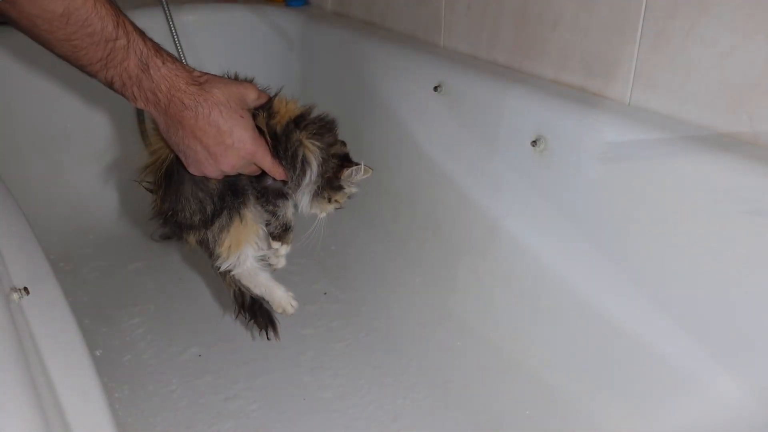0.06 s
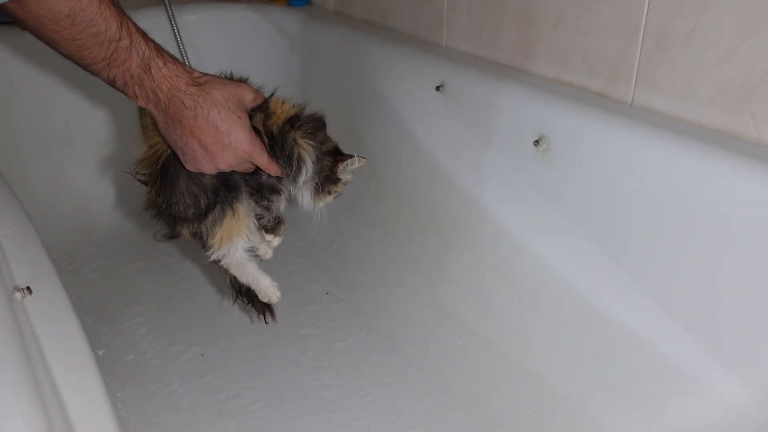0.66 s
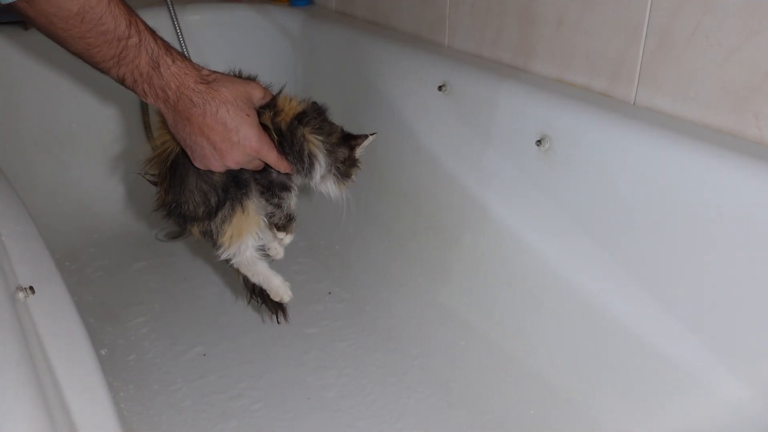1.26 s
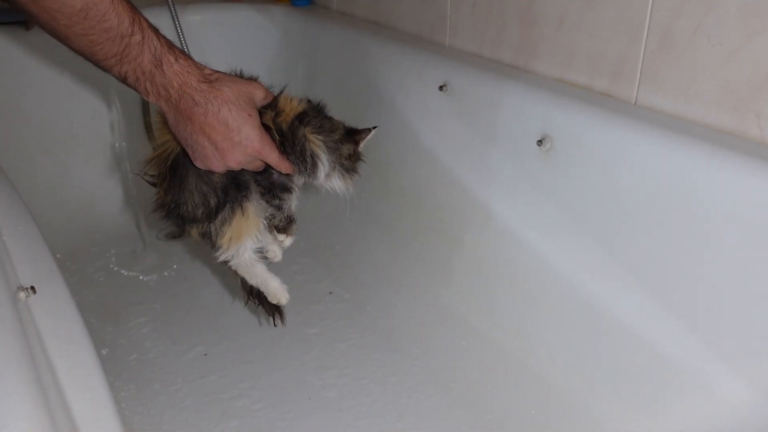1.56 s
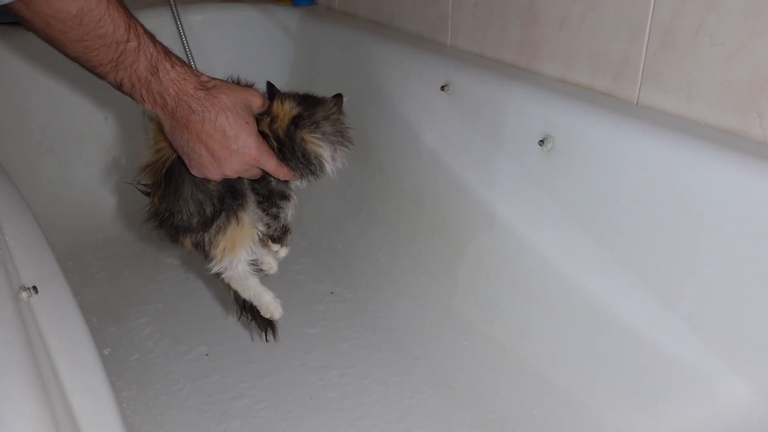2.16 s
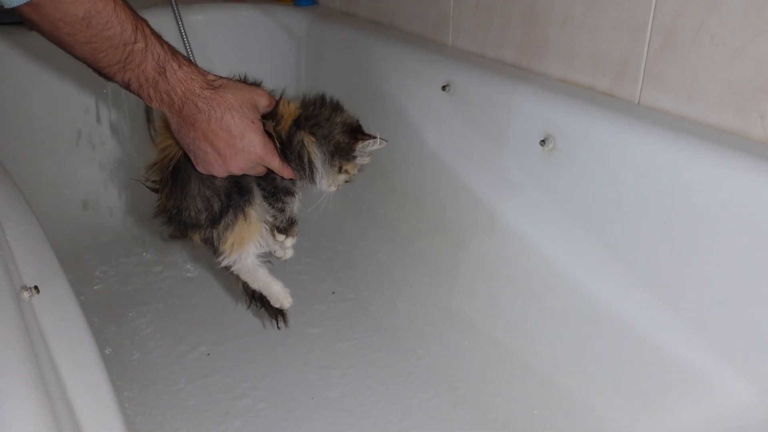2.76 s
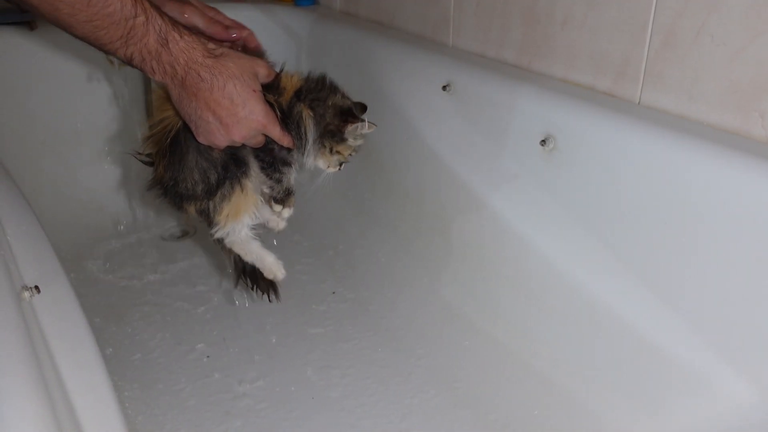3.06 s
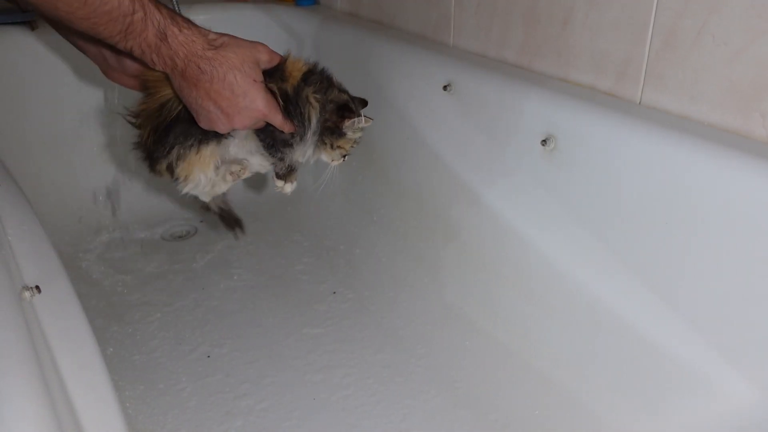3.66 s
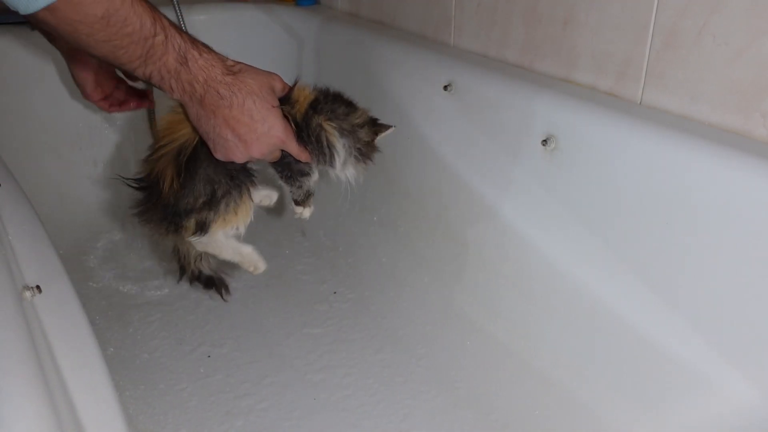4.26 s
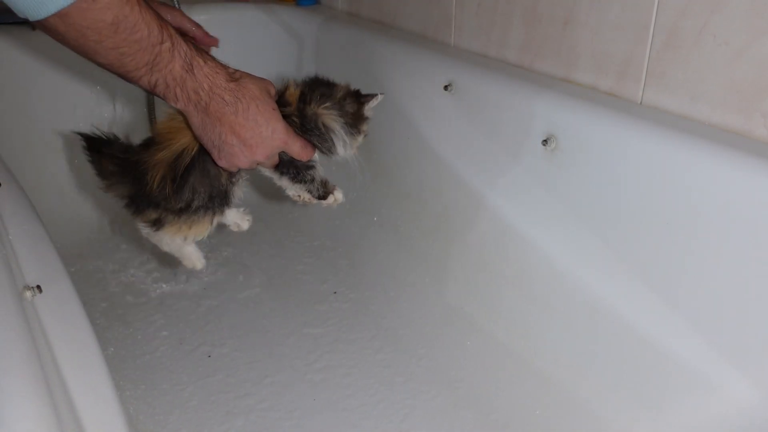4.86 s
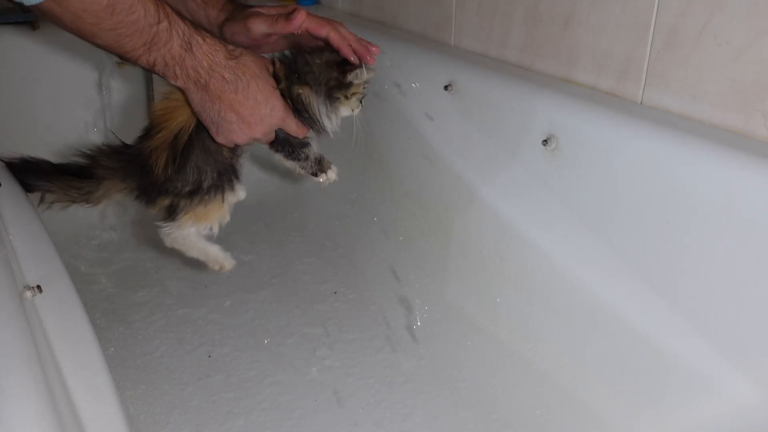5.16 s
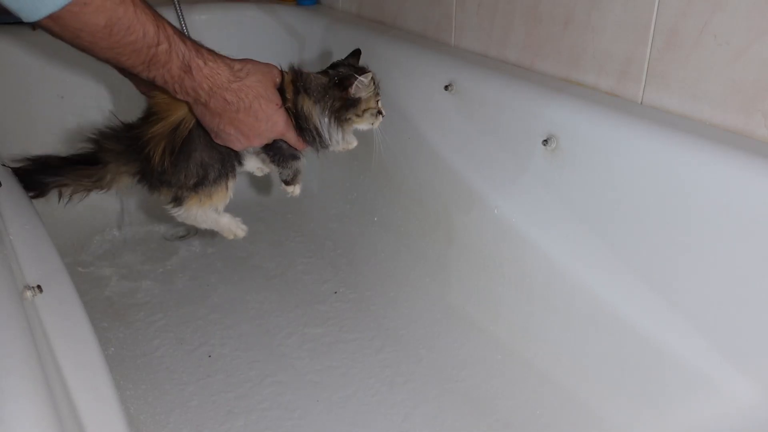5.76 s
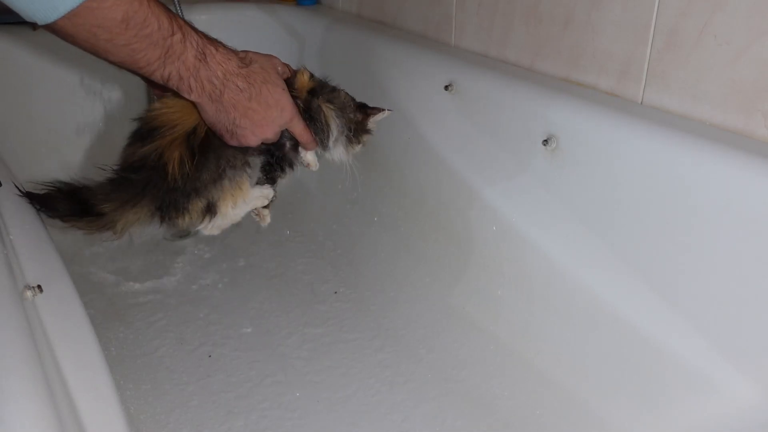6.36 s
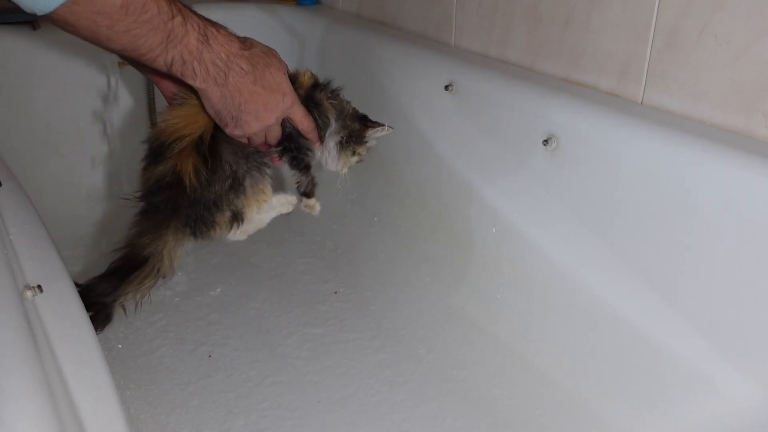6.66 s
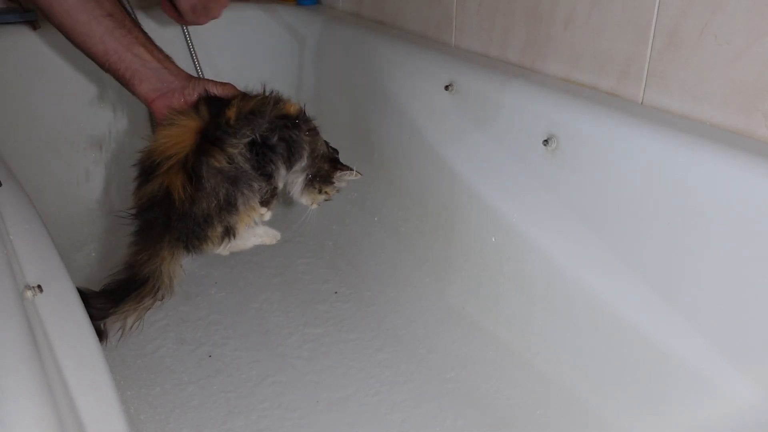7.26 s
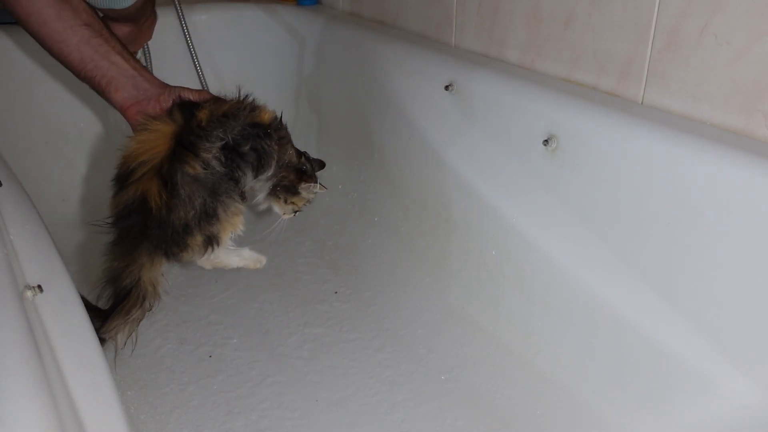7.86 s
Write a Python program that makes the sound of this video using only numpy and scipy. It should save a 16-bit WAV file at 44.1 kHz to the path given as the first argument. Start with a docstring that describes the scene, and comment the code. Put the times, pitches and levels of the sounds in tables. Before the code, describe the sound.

From about 0.3 seconds a hand shower sputters in short rattling spurts. Between 0.7 and 1.2 seconds a thin gurgling dribble, a few drips and a faint, wavering hollow tone of trapped air join in. At 1.5 seconds the spray starts, swelling within half a second to a steady, bright hiss of fine drops on a wet bathtub, with soft low drumming underneath. From then on, lumps of water fall from a hand and a kitten's fur in close, sharp, irregular slaps, several a second, the loudest sounds. The fur briefly muffles the jet near 1.9, 2.7, 4.6 and 7.8 seconds. Short splatters come and go, and small ringing plops sound around 2.4, 2.9 and 7.3 seconds. Soft bubbling slowly grows as shallow water gathers. The spray runs to the end at about 8 seconds, with short reflections from a small tiled bathroom.

```python
"""Short rattling spurts, a dribble and a hollow tone of trapped air as a hand shower's hose fills.
From 1.5 s the spray runs over a kitten held in a bathtub: drops tick on the enamel and drum the shell,
bubbles ring in the shallow water, lumps of water slap down from the fur and the hand.
The fur muffles the jet four times. The tub's walls and a small tiled bathroom add reflections."""
import sys
import numpy as np
from scipy import signal
from scipy.fft import rfft, irfft, next_fast_len
from scipy.io import wavfile

SR = 44100
rng = np.random.default_rng(int(sys.argv[2]) if len(sys.argv) > 2 else 0)


def store_pcm(level_fs):
    """Save levels as 16-bit WAV."""
    pcm = np.round(np.clip(level_fs, -1, 1) * 32767).astype(np.int16)
    wavfile.write(sys.argv[1], SR, np.atleast_2d(pcm).T)


N = 358091
TIME = np.arange(N) / SR

# drop ticks on wet enamel: f/Hz, gain/dB
TICK_SPECTRUM = [(60, -68), (200, -53), (350, -12.5), (750, -16), (1200, -7.5), (2300, -5), (3700, 6.5),
                 (5000, 2.5), (6300, 1.5), (10000, -6.5), (16000, -25.5)]
# jet turns into the fur: t/s, hold/s, loss/dB, recovery/s
FUR_DIPS = [(1.796, 0.062, 10.5, 1), (2.631, 0.088, 7, 0.073), (4.47, 0.19, 10, 0.12),
            (7.69, 0.12, 7.5, 0.15)]
# jet breaks on hand or fur: centre t/s, length/s, level/dB, centre f/Hz
SPLATTERS = [(1.75, 0.23, -46.5, 3880), (2.516, 0.16, -51, 8000), (2.906, 0.11, -51, 7040),
             (3.735, 0.5, -59, 4370), (4.875, 0.22, -50, 5100), (5.1, 0.86, -54, 5900),
             (6.625, 0.12, -49.5, 7400), (6.8, 0.1, -51.5, 3860), (7.707, 0.12, -47, 4400)]
# large lumps of water landing: t/s, level/dB, cavity f/Hz
BIG_LUMPS = [(1.488, -46, 2920), (1.5006, -35.5, 3530), (1.6267, -35, 4440), (1.645, -31.5, 3050),
             (1.7125, -31, 3020), (1.7753, -29.5, 5460), (1.953, -43.5, 4040), (2.219, -41, 3200),
             (2.3363, -33.5, 4120), (2.5169, -34.5, 3340), (2.561, -35, 3220), (2.6337, -35, 2480),
             (2.8265, -36.5, 2470), (2.877, -37.5, 6830), (2.9055, -33.5, 2330), (3.0053, -34, 5800),
             (3.0255, -39, 4330), (3.1141, -34.5, 5500), (3.151, -35.5, 3570), (3.2013, -31, 3640),
             (3.266, -32.5, 3740), (3.4757, -31, 4480), (3.6319, -36, 4280), (3.6641, -35, 3960),
             (3.7832, -31, 3380), (3.8489, -29, 3600), (3.9083, -33, 3200), (3.9245, -35.5, 4100),
             (3.9619, -35, 2700), (4.133, -36.5, 3760), (4.226, -34, 5270), (4.669, -39, 8100),
             (4.7713, -35, 3710), (4.8217, -34, 4570), (4.8776, -36, 5900), (4.917, -32.5, 2400),
             (4.9376, -29.5, 4100), (5.0866, -33.5, 3500), (5.1462, -32, 4220), (5.2046, -30, 2200),
             (5.3141, -32, 6030), (5.45, -32.5, 2850), (5.5747, -33, 4100), (5.799, -34.5, 4100),
             (5.83, -32.5, 2280), (6.0496, -32.5, 3940), (6.443, -35, 3700), (6.513, -33, 3800),
             (6.545, -32.5, 4140), (6.5757, -34, 7160), (6.623, -37, 3700), (6.647, -34, 3450),
             (6.726, -30.5, 4580), (6.7653, -30.5, 3610), (6.7994, -33, 4430), (6.8606, -31.5, 3220),
             (7.0406, -32, 4920), (7.099, -32.5, 4000), (7.2028, -33, 5450), (7.3973, -39, 3430),
             (7.476, -31, 3390), (7.6131, -32, 4060), (7.6712, -34, 4300), (7.8274, -37, 5570),
             (7.875, -34, 4620), (7.9271, -31, 3900), (8.0239, -31.5, 2390)]
# crack of a lump: f/Hz, gain/dB
CRACK_SPECTRUM = [(100, -35), (900, -30.5), (1600, -3), (3700, -1), (6300, 4.5), (9000, -11.5),
                  (16000, -45.5)]
# tub shell modes: f/Hz, level/dB, t60/s
TUB_MODES = [(94.3, -21, 0.12), (170.3, -22.5, 0.37), (285, -11, 0.19), (344, 1.5, 0.083),
             (393.7, 2.5, 0.12), (461, 1, 0.08), (536, -3.5, 0.16), (613, 0.5, 0.17), (634, -5, 0.13),
             (724, -3.5, 0.045), (812, -2.5, 0.046)]
# drumming on the bare tub: t/s, level/dB
DRUM_LEVELS = [(0.35, -81), (0.47, -63.5), (0.56, -80.5), (1.35, -83.5), (1.65, -70), (2.6, -68),
               (3.1, -65), (3.8, -67), (4.45, -62), (4.8, -67.5), (6.1, -66), (8.12, -67.5)]
# single drips and large bubbles: t/s, level/dB, f/Hz, t60/s
DRIPS = [(0.844, -44, 5430, 0.024), (0.971, -46, 7230, 0.022), (1.343, -55, 3930, 0.026),
         (1.397, -54, 3000, 0.024), (2.408, -38, 1780, 0.022), (2.433, -44.5, 939, 0.14),
         (2.798, -41, 3335, 0.024), (2.907, -41.5, 2290, 0.44), (2.912, -44, 3760, 0.26),
         (7.268, -37, 1475, 0.075)]
# bursts as the hose fills: t/s, level/dB, rise/s, hold/s, t60/s
BURSTS = [(0.3434, -58, 0.00093, 0.0069, 0.12), (0.4, -56, 0.0018, 0.084, 0.14),
          (0.529, -47, 0.0027, 0.0018, 0.022), (0.631, -52, 0.0096, 0.0062, 0.068),
          (0.72, -46.5, 0.0012, 0.0023, 0.033), (1.067, -53, 0.01, 0.0067, 0.055),
          (1.1678, -44, 0.00082, 0.0019, 0.078)]
# rattle of the first water: f/Hz, gain/dB
RATTLE_SPECTRUM = [(90, -53), (220, -14.5), (350, 6.5), (480, 0), (1400, 6), (2500, -2.5), (5500, 6.5),
                   (6400, -1.5), (9700, -4.5), (16000, -24.5)]
# shower head modes: f/Hz, level/dB, t60/s
HEAD_MODES = [(1270, -28, 0.044), (4290, -23, 0.049), (5350, -24, 0.03), (5700, -27, 0.03),
              (9640, -19.5, 0.01), (9800, -23, 0.01)]
# pitch of the air in the hose: t/s, f/Hz
HOSE_PITCH = [(0.721, 720), (.79, 653), (0.847, 730), (.94, 750), (1.0, 686), (1.12, 712), (1.18, 772)]
# air modes of the hose: ratio to pitch, level/dB
AIR_MODES = [(1, -68), (1.7, -73), (2.3, -74)]
# room hush: f/Hz, gain/dB
HUSH_SPECTRUM = [(50, -22), (250, -21), (360, -11), (1600, -4), (2600, -13), (4700, -14.5), (5100, -3.5),
                 (5600, -16.5), (15000, -30)]
# stereo width of the reflections: f/Hz, side gain/dB
SIDE_SPECTRUM = [(100, -12.5), (700, -13), (2800, -10), (11000, -7)]

SPRAY_ON_S = 1.49
LUMP_LOW_HZ, LUMP_HIGH_HZ = 2750, 6480


def spray():
    """Fine drops tick on wet enamel and leave tiny bubbles, in clumps; a few fat drops between."""
    ticks = rms_one(coloured(drops(per_s=15000, spread_db=4.5), TICK_SPECTRUM))
    ticks *= clumps(per_s=130, spread_db=3, t60_s=0.015, steady=0.099)
    fizz = bubbles(per_s=1500, spread_db=2.5, low_hz=2270, high_hz=7730, cycles=8)
    fizz *= clumps(per_s=63, spread_db=6.5, t60_s=0.024, steady=0.4)
    sparkle = bubbles(per_s=1200, spread_db=1, low_hz=5170, high_hz=11100, cycles=9.6)
    sparkle *= clumps(per_s=30, spread_db=-2.5, t60_s=0.19, steady=0.081)
    fat = bubbles(per_s=50, spread_db=0.5, low_hz=2520, high_hz=6630, cycles=8.4)
    mix = from_db(-2) * ticks + from_db(-5) * fizz + from_db(-6.5) * sparkle + from_db(-10) * fat
    return high_pass(mix, hz=300)


def spray_gain(full_db=-48.5, swell_db=11, swell_s=0.48):
    """The spray swells to a steady level, less the fur's loss."""
    onset_db = np.interp(TIME - SPRAY_ON_S, [0, swell_s], [-swell_db, 0])
    return (TIME > SPRAY_ON_S) * from_db(full_db + onset_db - fur_loss_db())


def fur_loss_db(turn_s=0.1):
    """Fur muffles the jet as it turns off the bare tub."""
    return sum(np.interp(TIME, at_s + np.cumsum([0, turn_s, hold_s, recovery_s]), [0, db, db, 0])
               for at_s, hold_s, db, recovery_s in FUR_DIPS)


def splatter(pitch_ratio=1.35):
    """Tiny droplets fly where the jet breaks on hand or fur."""
    out = 0
    for centre_s, length_s, db, hz in SPLATTERS:
        swell = np.cos(np.pi * np.clip((TIME - centre_s) / length_s, -0.5, 0.5))
        low_hz, high_hz = hz / pitch_ratio, hz * pitch_ratio
        droplets = bubbles(per_s=2400, spread_db=6.5, low_hz=low_hz, high_hz=high_hz, cycles=8.9)
        out += from_db(db) * swell * droplets
    return high_pass(out * clumps(per_s=75, spread_db=4, t60_s=0.025, steady=0.22), hz=1190)


def slaps(crack_t60_s=0.01, scatter_t60_s=0.36, cavity_t60_s=0.021, cavity_rise_s=0.0001, cavity_db=-4.5):
    """Each lump cracks on landing, rings the cavity it opens and scatters droplets."""
    impacts, cavities, t = np.zeros(N), np.zeros(N), TIME[:SR // 8]
    envelope = from_db(-60 * t / cavity_t60_s) * np.minimum(t / cavity_rise_s, 1)
    for at_s, db, hz in list(BIG_LUMPS) + small_lumps():
        scatter_db = -13 - 5 * np.log2(hz / LUMP_LOW_HZ)  # big, low-ringing lumps throw the most
        droplets = rng.standard_normal(len(t)) * narrowband(0, t, width_hz=400)
        droplets *= from_db(scatter_db - 60 * t / scatter_t60_s)
        crack = rng.choice([-1, 1], len(t)) * from_db(-60 * t / crack_t60_s)
        add(impacts, at_s, from_db(db) * (crack + droplets))
        cavity = np.std(envelope) * rms_one(envelope * narrowband(hz, t, width_hz=1900))
        add(cavities, at_s, from_db(db + cavity_db) * cavity)
    return from_db(-0.1) * coloured(impacts, CRACK_SPECTRUM) + high_pass(cavities, hz=1210)


def small_lumps(per_s=6, boost_db=12):
    """Lesser lumps fall at random, scaled to the spray. Rows: t/s, level/dB, cavity f/Hz."""
    running_s = TIME[-1] - SPRAY_ON_S
    when, pitch = rng.random((int(per_s * running_s), 2)).T
    at_s = SPRAY_ON_S + when * running_s
    spray_db = 20 * np.log10(np.interp(at_s, TIME, spray_gain()) + 1e-18)
    hz = LUMP_LOW_HZ * (LUMP_HIGH_HZ / LUMP_LOW_HZ) ** pitch
    return list(zip(at_s, spray_db + boost_db, hz))


def pool(formed_s=2.12, level_db=-62, deepening_db_per_s=0.69):
    """Larger bubbles gurgle once water has gathered, louder as it deepens."""
    gathered = np.interp(TIME, [SPRAY_ON_S, formed_s], [0, 1])
    gain = gathered ** 2 * from_db(level_db + deepening_db_per_s * (TIME - formed_s))
    medium = bubbles(per_s=1300, spread_db=4, low_hz=1304, high_hz=2550, cycles=13)
    large = bubbles(per_s=900, spread_db=3.5, low_hz=700, high_hz=1307, cycles=33)
    return gain * (medium + from_db(-13) * large)


def tub_drumming(fur_share=0.77):
    """Drops strike the shell, each mode at its own strength; softer with the jet in the fur."""
    hits = drops(per_s=2500, spread_db=4)
    shell = 0
    for hz, db, t60_s in TUB_MODES:
        velocity = np.diff(ring(hits * rng.standard_normal(N), hz, t60_s), prepend=0)
        radiated = high_pass(velocity, hz * 0.83)  # poor radiation below the mode
        shell += from_db(db) * rms_one(radiated)
    at_s, bare_db = np.transpose(DRUM_LEVELS)
    level_db = np.interp(TIME, at_s, bare_db) - fur_share * fur_loss_db()
    return (TIME > at_s[0]) * from_db(level_db) * rms_one(shell)


def plops(glide_per_t60=0.026, rise_s=0.00065, wobble=3):
    """A large bubble wobbles, blurring its tone, and rises in pitch near the surface."""
    out, t = np.zeros(N), TIME[:SR // 4]
    for at_s, db, hz, t60_s in DRIPS:
        pitch_hz = hz * (1 + glide_per_t60 * t / t60_s)
        tone = np.sin(2 * np.pi * np.cumsum(pitch_hz) / SR)
        tone += wobble * narrowband(pitch_hz, t, width_hz=520)
        envelope = from_db(db - 60 * t / t60_s) * (1 - np.exp(-t / rise_s))
        add(out, at_s, np.std(envelope) * rms_one(envelope * tone))
    return high_pass(out, hz=740)


def spurts(dribble_on_s=0.72, dribble_hold_s=0.071, fade_db_per_s=19):
    """The first water rattles out in bursts that ring the shower head; a thin dribble gurgles between."""
    force, t = np.zeros(N), TIME[:SR // 2]
    for at_s, db, rise_s, hold_s, t60_s in BURSTS:
        decay_db = 60 * np.maximum(t - rise_s - hold_s, 0) / t60_s
        add(force, at_s, np.minimum(t / rise_s, 1) * from_db(db - decay_db))
    age_s = TIME - dribble_on_s
    dribble = (age_s > 0) * from_db(-58 - fade_db_per_s * np.maximum(age_s - dribble_hold_s, 0))
    rattle = force * rms_one(coloured(drops(per_s=6000, spread_db=3.5), RATTLE_SPECTRUM))
    head = sum(from_db(db) * rms_one(ring(rattle, hz, t60_s)) for hz, db, t60_s in HEAD_MODES)
    rattle += np.std(rattle) * head
    rattle += from_db(-7) * dribble * rms_one(coloured(drops(per_s=1500, spread_db=2.5), RATTLE_SPECTRUM))
    reflected = signal.fftconvolve(rattle, echoes(room_db=-11))[:N]  # one spot, one echo pattern
    gurgle = bubbles(per_s=700, spread_db=2.5, low_hz=1212, high_hz=4350, cycles=70)
    tinkle = bubbles(per_s=120, spread_db=5, low_hz=4380, high_hz=8840, cycles=90)
    bubbling = dribble * (from_db(-4) * gurgle + from_db(-9) * tinkle)
    return high_pass(from_db(-1.5) * (rattle + reflected) + bubbling, hz=160)


def hose_tone(rise_s=0.01, fade_s=0.04):
    """Trapped air sounds a wavering hollow tone until the water pushes it out."""
    at_s, hz = np.transpose(HOSE_PITCH)
    gate = np.interp(TIME, [at_s[0] - rise_s, at_s[0], at_s[-1], at_s[-1] + fade_s], [0, 1, 1, 0])
    pitch_hz = np.interp(TIME, at_s, hz)
    return gate * sum(from_db(db) * narrowband(ratio * pitch_hz, TIME, width_hz=110)
                      for ratio, db in AIR_MODES)


def bathroom(dry, lean_db=-0.5, wander_hz=30, spots=8):
    """Water lands on shifting spots, each with its own reflections; these widen the treble."""
    shares = np.array([narrowband(0, TIME, wander_hz) for _ in range(spots)])
    shares /= np.linalg.norm(shares, axis=0)
    size = next_fast_len(N + SR // 2, True)
    ahead, across = 0, 0
    for share in shares:
        landed = rfft(dry * share, size)
        ahead += landed * rfft(echoes(), size)
        across += landed * rfft(echoes(), size)
    echo_power = np.sum(echoes() ** 2)
    mid = (dry + irfft(ahead, size)[:N]) / np.sqrt(1 + echo_power)
    side = coloured(irfft(across, size)[:N], SIDE_SPECTRUM) / np.sqrt(echo_power)
    return np.array([(mid + side) * from_db(lean_db), (mid - side) * from_db(-lean_db)])


def echoes(tub_db=-3, tub_t60_s=0.059, room_db=-6, room_t60_s=0.42):
    """Impulse response: quick reflections between the tub's walls, then the tiled room."""
    t = TIME[:SR // 2]
    tub = rng.standard_normal(len(t)) * from_db(-60 * t / tub_t60_s) * (t > 0.001)
    room = rng.standard_normal(len(t)) * from_db(-60 * t / room_t60_s) * (t > 0.008)
    return from_db(tub_db) * tub / np.linalg.norm(tub) + from_db(room_db) * room / np.linalg.norm(room)


def room_hush(level_db=-93.5):
    """Faint steady noise of the room."""
    return from_db(level_db) * rms_one(coloured(rng.standard_normal(N), HUSH_SPECTRUM))


def drops(per_s, spread_db):
    """Impacts at random times: many near unit size, a few up to 3 * spread_db from it."""
    sizes = from_db(spread_db * np.minimum(rng.exponential(1, N), 3))
    return sizes * rng.choice([-1, 1], N) * (rng.random(N) < per_s / SR)


def clumps(per_s, spread_db, t60_s, steady):
    """Gain of water landing in clumps: power jumps and decays over a steady share."""
    pole = from_db(-120 / (t60_s * SR))
    power = signal.lfilter([1], [1, -pole], np.abs(drops(per_s, spread_db)) + 1e-18)
    return rms_one(np.sqrt(steady + power / power.mean()))


def bubbles(per_s, spread_db, low_hz, high_hz, cycles, glide=0.11):
    """Each bubble rings at its own pitch, rising near the surface; t60 = cycles / pitch."""
    pitch, strength, when = np.hsplit(rng.random((int(per_s * N / SR), 3)), 3)
    hz = low_hz * (high_hz / low_hz) ** pitch
    size = from_db(spread_db * np.minimum(-np.log(strength), 4))
    steps = np.arange(int(min(cycles / low_hz, 0.03) * SR * 0.6))
    age = steps / SR * hz / cycles  # in t60s
    envelope = size * np.sqrt(hz) * from_db(-60 * age)
    waves = envelope * np.sin(2 * np.pi * cycles * age * (1 + glide * age))
    index = (when * N).astype(int) + steps
    sound = np.bincount(index.ravel(), waves.ravel(), N)[:N]
    return rms_one(high_pass(sound, low_hz / 2))  # little radiation below the pitch


def narrowband(hz, t, width_hz):
    """Tone of wandering strength and phase; at 0 Hz, the wander alone."""
    phase = 2 * np.pi * np.cumsum(np.broadcast_to(hz, t.shape)) / SR
    knots = rng.standard_normal((2, int(t[-1] * width_hz) + 2))
    in_phase, quadrature = (np.interp(t * width_hz, np.arange(len(row)), row) for row in knots)
    return in_phase * np.cos(phase) + quadrature * np.sin(phase)


def ring(clicks, hz, t60_s):
    """Resonator: a unit click starts a decaying unit sine."""
    radius, angle = from_db(-60 / (t60_s * SR)), 2 * np.pi * hz / SR
    return signal.lfilter([0, np.sin(angle)], [1, -2 * radius * np.cos(angle), radius ** 2], clicks + 1e-18)


def coloured(x, spectrum):
    """Minimum-phase filter from rows of f/Hz, gain/dB."""
    size = 2 * next_fast_len(len(x) // 2 + 4096)
    hz, db = np.transpose(spectrum)
    grid_hz = np.maximum(np.arange(size // 2 + 1) * SR / size, 1)
    gain = from_db(np.interp(np.log(grid_hz), np.log(hz), db))
    cepstrum = irfft(np.log(gain))
    cepstrum[1:size // 2] *= 2
    cepstrum[size // 2 + 1:] = 0
    return irfft(rfft(x, size) * np.exp(rfft(cepstrum)))[:len(x)]


def high_pass(x, hz):
    """Second-order bass cut."""
    return signal.sosfilt(signal.butter(2, hz, "high", fs=SR, output="sos"), x)


def add(track, at_s, sound):
    """Mix a sound in at at_s."""
    start = round(at_s * SR)
    track[start:start + len(sound)] += sound[:N - start]


def from_db(db):
    """Decibels to gain."""
    return 10 ** (np.asarray(db) / 20)


def rms_one(x):
    """Scale to unit power."""
    return x / np.sqrt(np.mean(x ** 2) + 1e-20)


def scene():
    """Water and hush in the room; close slaps and low drumming also reach both sides directly."""
    running = spray_gain() * spray() + splatter() + pool()
    hush = room_hush()
    lumps = slaps()
    direct = from_db(-7) * lumps + tub_drumming()
    return direct + bathroom(running + from_db(-2.5) * lumps + plops() + spurts() + hose_tone() + hush)


def record(dry, low_hz=70.5, high_hz=15900):
    """A small microphone loses the deep bass; a steep low-pass cuts the top."""
    low_pass = signal.ellip(12, 0.1, 70, high_hz, fs=SR, output="sos")
    return signal.sosfilt(low_pass, high_pass(dry, low_hz))


dry = scene()
out = record(dry)
store_pcm(out)
```